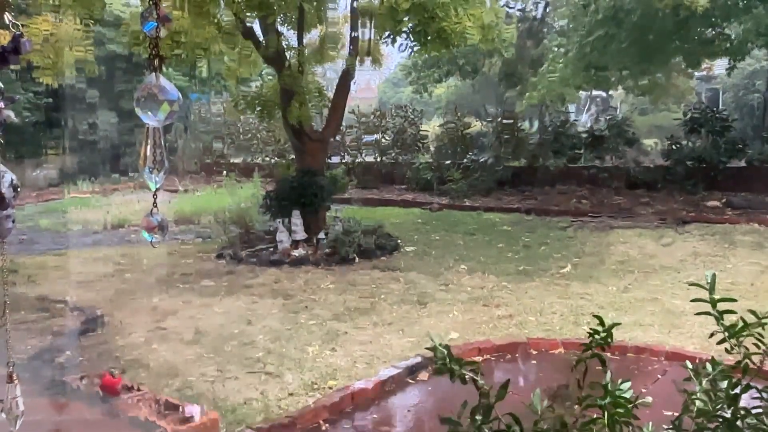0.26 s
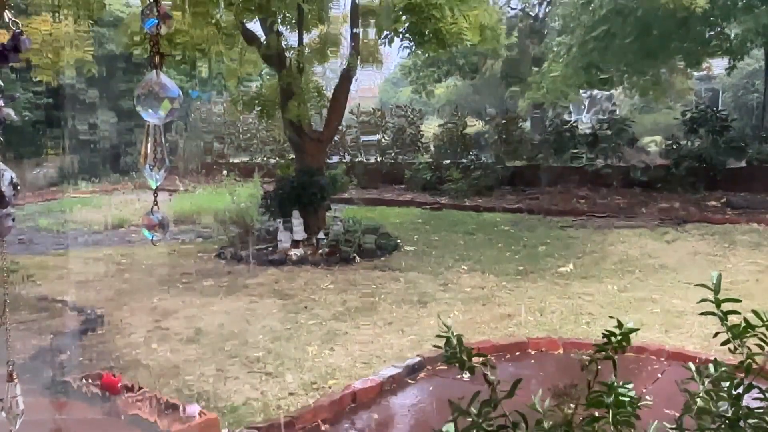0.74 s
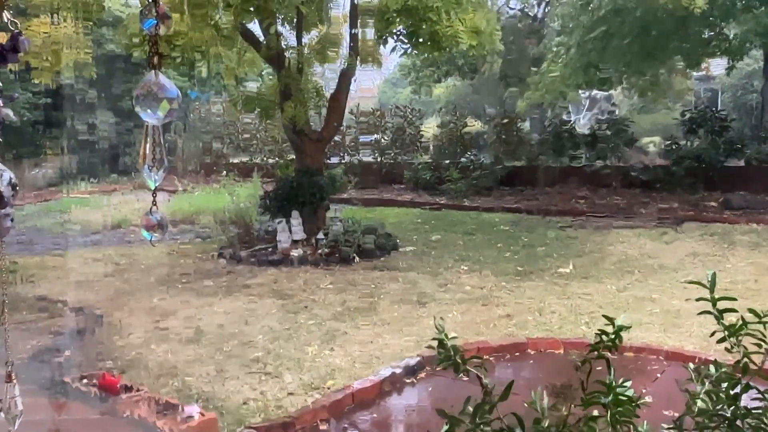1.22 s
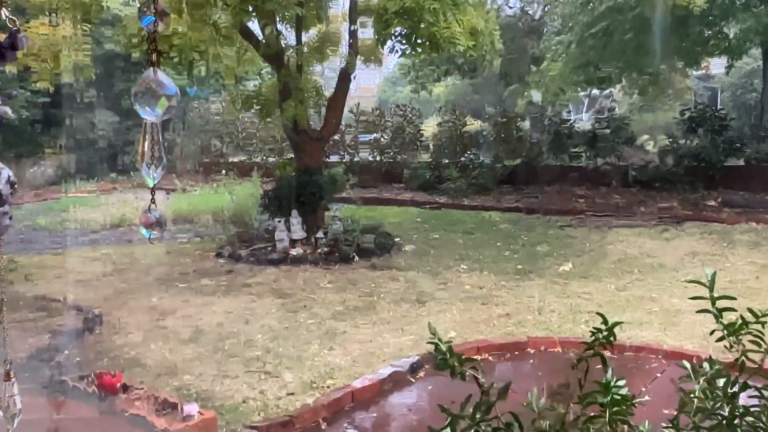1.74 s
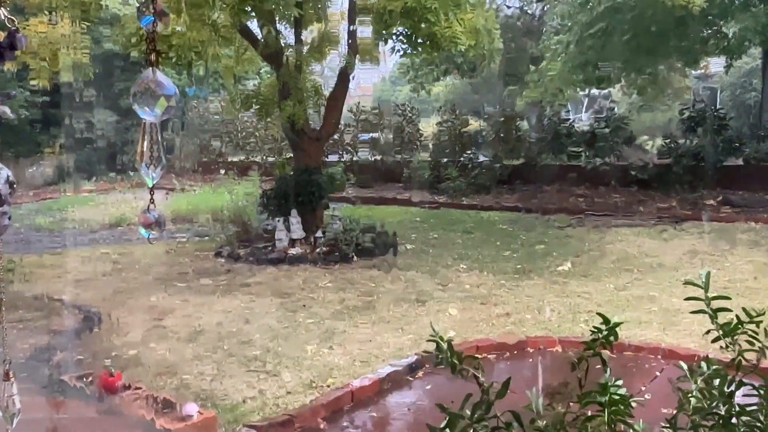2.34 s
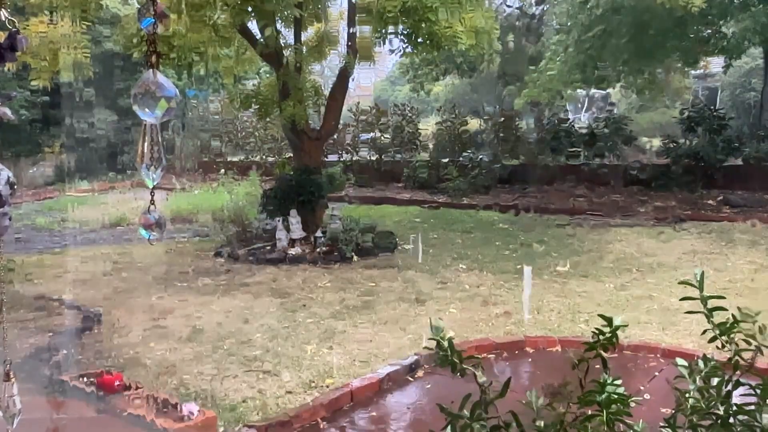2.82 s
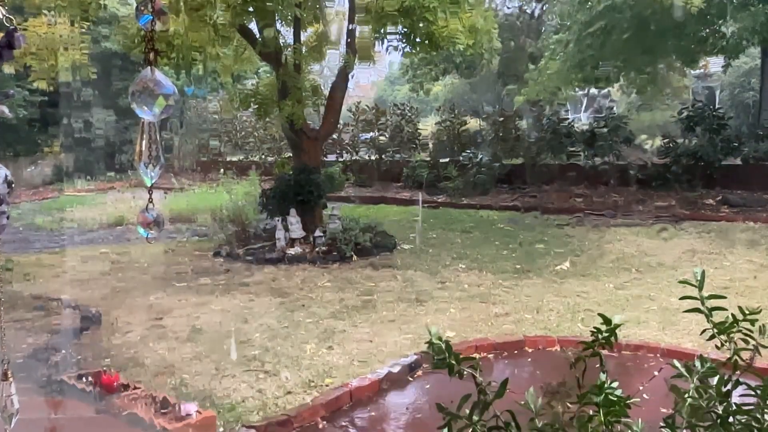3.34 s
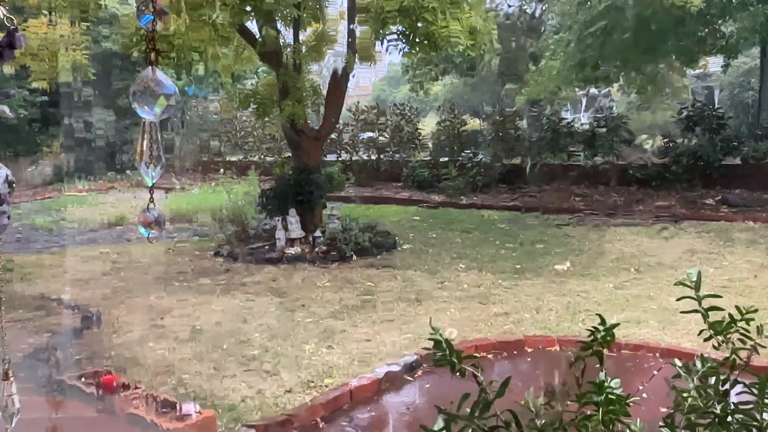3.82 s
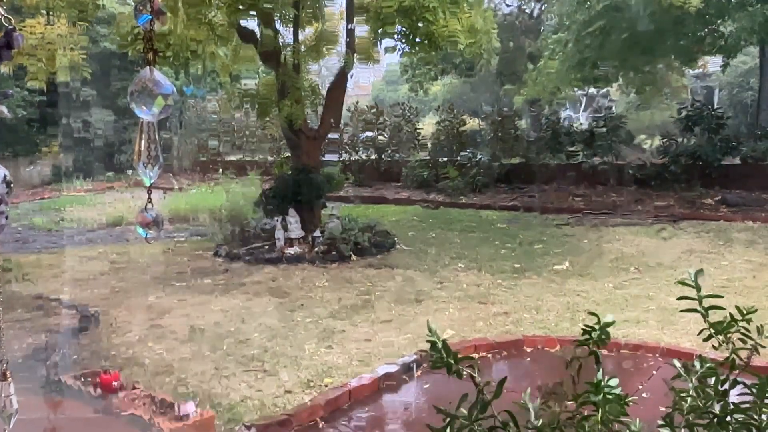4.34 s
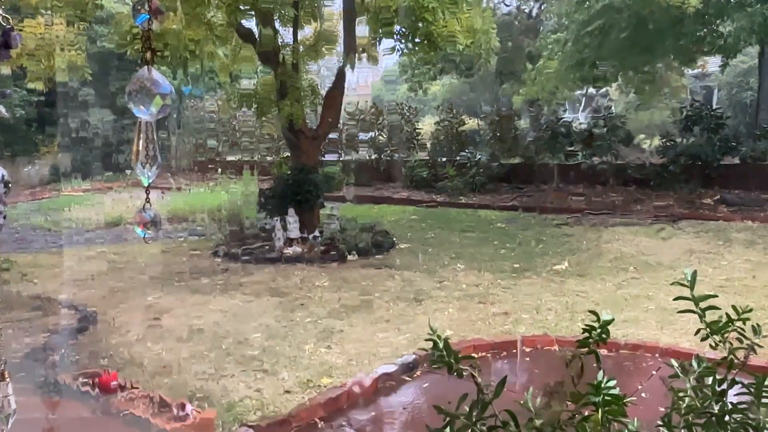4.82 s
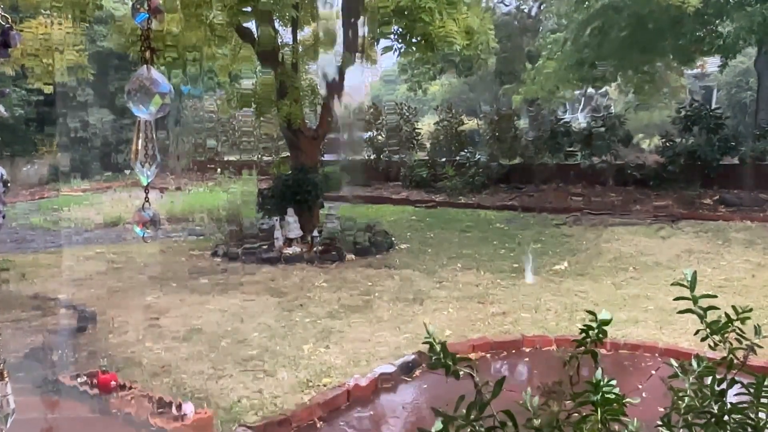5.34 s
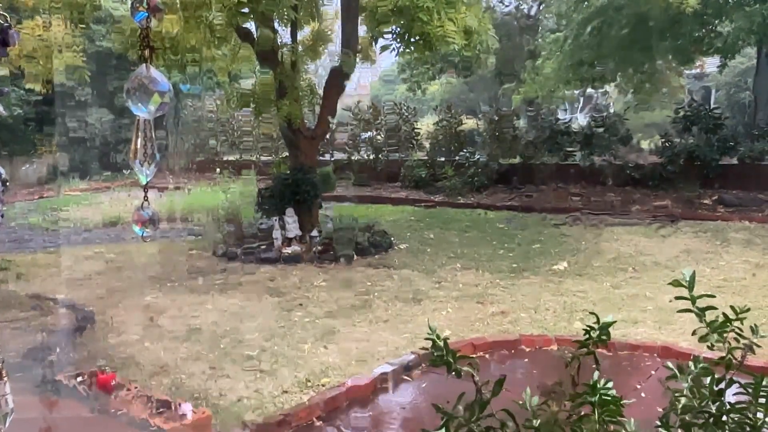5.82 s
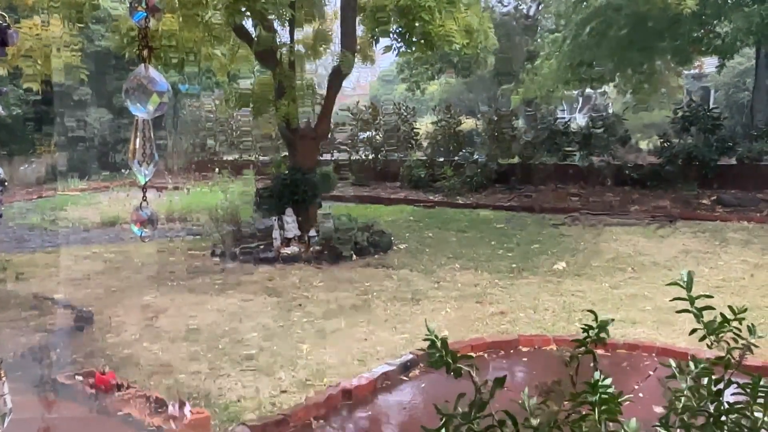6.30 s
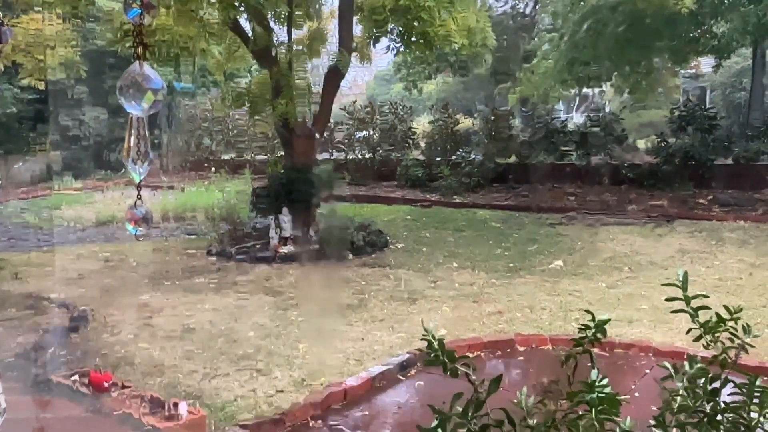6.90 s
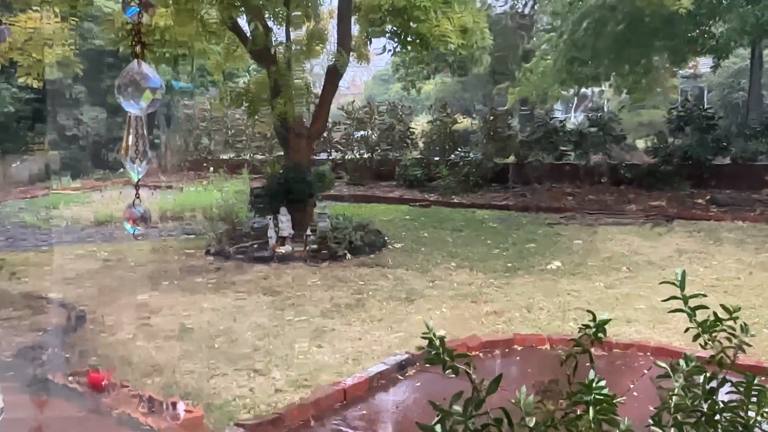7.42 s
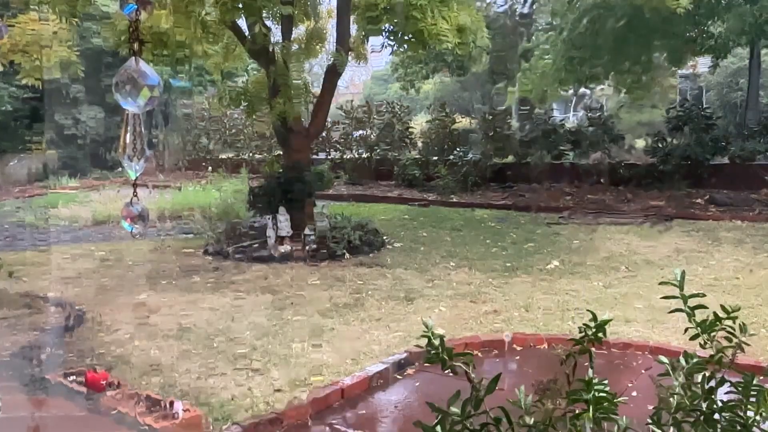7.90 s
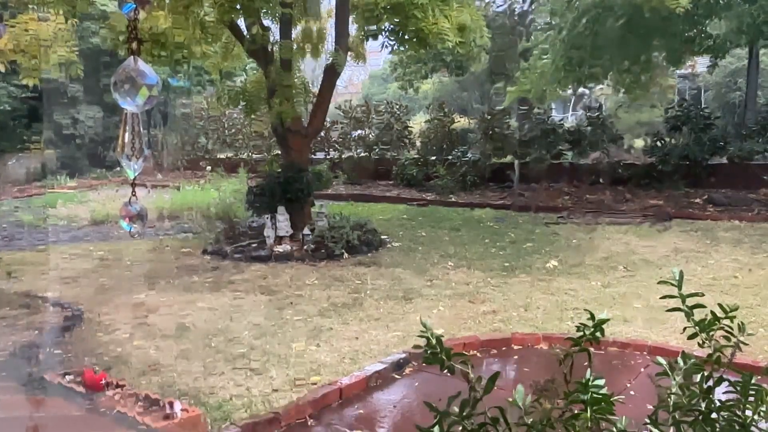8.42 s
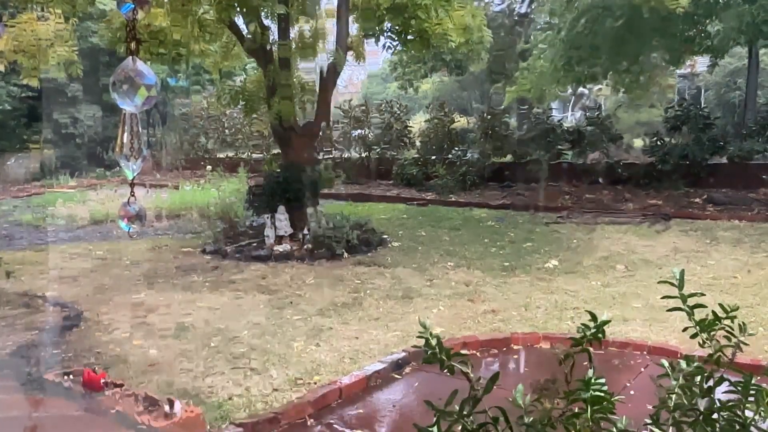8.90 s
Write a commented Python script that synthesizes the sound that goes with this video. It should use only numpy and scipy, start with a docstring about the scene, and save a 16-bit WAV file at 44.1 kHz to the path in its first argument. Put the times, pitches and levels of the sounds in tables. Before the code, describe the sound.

From a sheltered house, rain washes and drips tick on brick while a double thunder peal booms, rattles glass and slowly fades into low rumbling.

```python
"""Steady rain falls on a garden, heard from the shelter of a house: many random drops merge into a wash.
Thunder, a pile of tiny shocks, starts with a tearing sound, then peals twice, rattling a pane and booming.
It then rolls away in ever duller rumbles, shaped by a list of peals over a slowly changing roll.
All along, drips pat, tick and splash on wet brick and leaves, made of short bursts of tiny impacts.
Thin metal rings faintly under the drops, and pings under three heavier ones in the second half."""
import sys
import numpy as np
from scipy import signal
from scipy.fft import rfft, irfft
from scipy.io import wavfile
from scipy.ndimage import uniform_filter1d

SR = 44100
rng = np.random.default_rng(int(sys.argv[2]) if len(sys.argv) > 2 else 0)


def digitize_waveform(pressure):
    """Quantize a signal to 16-bit integers and store it at the path in sys.argv[1].

    Rows of a 2-D input are taken as channels; values are limited to [-1, 1].
    """
    field = np.atleast_2d(pressure).T
    bounded = np.clip(field, -1, 1)
    quanta = np.round(bounded * 32767).astype(np.int16)
    wavfile.write(sys.argv[1], SR, quanta)


N = 403956
TIME = np.arange(N) / SR
BINS_HZ = np.maximum(np.arange(N // 2 + 1) * SR / N, 1)

# In the tables, levels are relative: each sound's own gain may shift them all together.
# t60 is the time a sound takes to fall by 60 dB.


def from_db(db):
    """Turn decibels into a gain."""
    return 10 ** (np.asarray(db) / 20)


def rms_one(x):
    """Scale a signal to an average strength (rms) of 1."""
    return x / np.sqrt(np.mean(x ** 2) + 1e-20)


def at_hz(rows, hz):
    """Read the columns of a table at any frequency, on a log-frequency axis."""
    points, *columns = np.transpose(rows)
    return [np.interp(np.log(hz), np.log(points), column) for column in columns]


def tint(x, colour):
    """Give a signal a spectrum; white noise keeps its power."""
    gain = rms_one(from_db(at_hz(colour, BINS_HZ)[0]))
    return irfft(rfft(x) * gain, N)


def drift(rate):
    """Smooth chance: random points, `rate` of them a second, joined by straight lines."""
    points = rng.standard_normal(2000)
    return np.interp(TIME * rate, np.arange(len(points)), points)


def impacts(per_s, spread_db):
    """Two streams of randomly timed clicks of uneven size, with an rms of 1."""
    sizes = from_db(spread_db * np.minimum(rng.exponential(1, (2, N)), 4))
    signs = rng.choice([-1, 1], (2, N))
    happens = rng.random((2, N)) < per_s / SR
    return rms_one(sizes * signs * happens)


def flurry_energy(per_s, spread_db, t60):
    """Energy left by random impacts that each die away over t60 seconds."""
    fall = from_db(-60 / (SR * t60))
    hits = impacts(per_s, spread_db)[0] ** 2 + 1e-18
    return signal.lfilter([1], [1, -fall ** 2], hits)


def resonate(x, hz, width_hz):
    """Ring at one pitch, like a small struck body; white noise keeps its power."""
    r = np.exp(-np.pi * width_hz / SR)
    poles = [1, -2 * r * np.cos(2 * np.pi * hz / SR), r * r]
    return signal.lfilter([1, 0, -1], poles, x) * np.sqrt((1 - r * r) / 2)


def burst(age, rise_s, t60, tail_db, tail_t60):
    """Loudness shape of one impact: a quick rise, a fall, and a faint tail off the walls."""
    age = np.maximum(age, 0)
    rise = 1 - np.exp(-age / rise_s)
    fall = from_db(-60 * age / t60)
    tail = from_db(tail_db - 60 * age / tail_t60)
    return rise * (fall + tail)


def bursts(events, rise_s, t60, tail_db, tail_t60):
    """Loudness shape of a table of impacts, whose powers add up."""
    power = np.zeros(N + SR)
    shape = burst(TIME[:SR], rise_s, t60, tail_db, tail_t60)
    for s, db in events:
        start = max(int(s * SR), 0)
        power[start:start + SR] += (from_db(db) * shape) ** 2
    return np.sqrt(power[:N])


def swelling_tones(rows):
    """Each row is a resonance that builds up and soon dies."""
    out, age = np.zeros(N + SR), TIME[:SR]
    for s, hz, db, swell_s in rows:
        start = int(s * SR)
        swells = age / swell_s
        shape = swells * np.exp(1 - np.minimum(swells, 50))  # reaches 1 after swell_s
        out[start:start + SR] += from_db(db) * shape * np.sin(2 * np.pi * hz * age)
    return out[:N]


# short echoes off floor, roof and walls: (delay t/s, level/dB)
ECHOES = [(.00404, -38.5), (.00626, -17), (.00716, -45.5), (0.0335, -17), (.046, -17.5)]
# standing waves of the shelter: (f/Hz, width/Hz, level/dB)
STANDING_WAVES = [(44.3, 14, 2.5), (139.3, 5.5, -12.5), (214.7, 13.3, 4.5), (302, 9.4, 1.2), (378, 49, 4.5),
                  (436, 27, 3), (578, 43, 5), (701, 38, 4.5), (787, 16, 3), (797, 9.8, 6), (880, 33, 6),
                  (1002, 87, 5), (1330, 11, 2.5), (1437, 21, 4)]


def shelter(x):
    """Near walls add short echoes and lift or weaken a few standing waves."""
    response = 1
    for delay, db in ECHOES:
        response = response + from_db(db) * np.exp(-2j * np.pi * BINS_HZ * delay)
    lift_db = 0
    for hz, width, db in STANDING_WAVES:
        lift_db = lift_db + db / (1 + (2 * (BINS_HZ - hz) / width) ** 2)
    return irfft(rfft(x) * rms_one(response) * from_db(lift_db), N)


# colour of the rain and the storm's low murmur: (f/Hz, level/dB per Hz)
RAIN_COLOUR = [(20, -22.5), (45, 24), (180, 8.5), (400, 0.5), (900, -9.5), (1900, -8.5), (2600, -24.5),
               (4200, -22.5), (5500, -28.5), (7000, -28.5), (8100, -19.5), (9600, -26.5), (10800, -42.5),
               (15500, -50.5)]


def rain(drops_per_s=9000, spread_db=2.5, level_db=-52.5, waver_db=1.4, clump_db=1.2):
    """Countless far drops on lawn and trees merge into a wash over the storm's low murmur."""
    wash = tint(impacts(drops_per_s, spread_db), RAIN_COLOUR)
    hiss = irfft(rfft(wash) * np.interp(BINS_HZ, [5000, 8000], [0, 1]), N)
    waver = from_db(level_db + waver_db * drift(23))
    # the fine hiss of the nearest drops comes in clumps
    clumped_hiss = hiss * from_db(clump_db * drift(12))
    return waver * (wash - hiss + clumped_hiss)


def patter(per_s=240, level_db=-74.5, spread_db=4.5, width_hz=1500, tilt_db=-8.5, t60=0.09):
    """Lesser drips at random: short broad splats, each surface with its own pitch."""
    out, pitches = 0, np.geomspace(1600, 5600, num=8)
    for hz in pitches:
        energy = flurry_energy(per_s / len(pitches), spread_db, t60)
        ring = resonate(resonate(impacts(6000, 2.5), hz, width_hz), hz, width_hz)
        weight = from_db(tilt_db * np.log2(hz / pitches[0]))  # tilt_db per octave
        out = out + weight * rms_one(np.sqrt(energy) * ring)
    return from_db(level_db) * rms_one(out)


def lesser(count, db, spread_db):
    """Faint drops at random moments, one to each equal share of the time: rows (t/s, level/dB)."""
    place, size = rng.random((count, 2)).T
    times = (np.arange(count) + place) * N / SR / count
    return list(zip(times, db + spread_db * (2 * size - 1)))


# small hard drops that tick close by: (t/s, peak level/dB)
TICKS = [(0.1665, -61), (0.7896, -62), (1.499, -63), (3.1143, -63), (3.2625, -57.5), (3.7738, -62),
         (3.9862, -60), (4.245, -62), (4.5425, -65), (4.7155, -68), (5.7069, -59.5), (5.765, -64),
         (6.932, -74), (7.1881, -59.5), (7.265, -67), (7.4974, -71), (7.5637, -75), (8.638, -68)]
# drips that burst into spray on wet ground: (t/s, peak level/dB)
SPLASHES = [(0.7516, -63), (0.945, -63), (1.59, -69), (1.9699, -63), (2.2492, -63.5), (3.185, -62),
            (3.66, -64.5), (3.7843, -61), (4.14, -67), (4.1964, -65), (4.4934, -62), (4.7275, -56),
            (4.9, -67), (5.125, -67), (5.25, -68), (5.445, -63), (5.865, -75), (6.0661, -60), (6.48, -66),
            (6.6149, -60), (7.4981, -62), (7.5718, -59.5), (7.6894, -64), (7.915, -65), (8.235, -67),
            (8.6119, -59), (8.7046, -63), (8.8398, -62), (9.065, -72)]
# colour of a tick: (f/Hz, level/dB per Hz)
TICK_COLOUR = [(1500, -19.5), (3500, -8.5), (7000, 5), (9500, -2), (11000, -20.5), (15000, -10)]
# colour of the spray: (f/Hz, level/dB per Hz)
SPRAY_COLOUR = [(3000, -9.5), (6800, -5.5), (8000, 8), (9500, 0), (11000, -14.5), (15500, -31)]


def splashes(tick_db=1.0, spray_db=-5.5):
    """Near drops: a hard tick, or a hiss of fine droplets falling back."""
    ticks = TICKS + lesser(count=22, db=-65.5, spread_db=0.5)
    sprays = SPLASHES + lesser(count=22, db=-75.0, spread_db=-5.5)
    tick_shape = bursts(ticks, rise_s=0.00032, t60=0.014, tail_db=-11.0, tail_t60=0.17)
    spray_shape = bursts(sprays, rise_s=0.0027, t60=0.04, tail_db=-2.0, tail_t60=0.3)
    tick = tint(tick_shape * impacts(12000, 2.2), TICK_COLOUR)
    spray = tint(spray_shape * impacts(5000, 2.8), SPRAY_COLOUR)
    return from_db(tick_db) * tick + from_db(spray_db) * spray


# heavy drips on brick and leaves; narrow for a plop, wide for a splat:
# (t/s, level/dB, f/Hz, width/Hz, t60/s)
PATS = [(0.2882, -57, 6400, 1200, .03), (0.753, -60, 3700, 3000, .15), (0.929, -60.5, 4300, 2200, 0.37),
        (1.936, -55, 2970, 1180, 0.05), (1.989, -56, 2900, 1200, 0.058), (2.04, -56, 2970, 1200, 0.045),
        (2.228, -63, 4040, 2000, 0.38), (2.327, -59.5, 3300, 1494, 0.22), (2.4244, -55, 6000, 2400, .03),
        (2.44, -54, 5800, 2400, .035), (2.456, -58, 5800, 2000, .03), (2.482, -65, 5700, 1200, .04),
        (2.508, -59, 4200, 3500, 0.08), (3.228, -59.5, 3360, 1800, 0.17), (3.262, -55.5, 3200, 1610, 0.13),
        (3.647, -59.5, 3000, 2000, 0.14), (3.735, -53, 2300, 1090, 0.16), (3.85, -55, 2600, 1800, 0.11),
        (3.915, -55, 2400, 1000, 0.11), (3.962, -58, 3700, 2200, 0.097), (3.986, -47, 4630, 1390, 0.016),
        (4.244, -61, 2600, 2400, .1), (4.535, -52.5, 3300, 900, .035), (4.543, -61, 3600, 2200, 0.09),
        (5.513, -59.5, 2600, 1800, 0.32), (5.706, -58.5, 3230, 2600, 0.22), (5.876, -60, 2900, 2000, .12),
        (6.018, -60.5, 3180, 1700, 0.26), (6.29, -61.5, 3400, 1800, 0.12), (6.727, -55, 6100, 1600, 0.023),
        (6.7453, -47, 6700, 1700, 0.016), (6.756, -60, 6100, 1600, .04), (6.779, -59, 6400, 2200, .03),
        (6.782, -57.5, 3700, 1400, .06), (6.836, -46, 2000, 900, 0.12), (6.835, -56.5, 3770, 1800, 0.15),
        (6.932, -54.5, 4200, 800, 0.053), (6.973, -49, 1870, 1100, 0.05), (7.127, -57, 3170, 1400, 0.08),
        (7.188, -40, 3000, 480, 0.032), (7.199, -48, 3200, 905, 0.034), (7.563, -55.5, 3650, 2400, 0.1),
        (7.9, -65, 2900, 2000, 0.14), (8.077, -66, 3300, 1800, 0.11), (8.15, -49.5, 1970, 280, 0.087),
        (8.153, -58, 3770, 550, .05), (8.429, -58, 4600, 750, .06), (8.695, -62, 3200, 1500, 0.11),
        (9.011, -60, 3450, 1400, 0.14)]


def pats(gain_db=-5.0):
    """Each heavy drip hits sharply and breaks up in a flurry of tiny impacts; what it lands on rings briefly."""
    out = np.zeros((2, N + SR))
    grains = np.tile(impacts(14000, 4.0), 2)  # repeated, so late drips do not run out
    for s, db, hz, width_hz, t60 in PATS:
        shape = burst(TIME[:SR // 2], rise_s=0.0019, t60=t60, tail_db=-21.5, tail_t60=0.31)
        span = slice(int(s * SR), int(s * SR) + len(shape))
        body = resonate(resonate(grains[:, span], hz, width_hz), hz, width_hz)
        out[:, span] += from_db(db + gain_db) * shape * rms_one(body)
    return out[:, :N]


# pitches at which thin metal nearby, perhaps the gutter, rings: (f/Hz, rms level/dB, t60/s)
GUTTER_MODES = [(1320, -83.5, 0.12), (1340, -78.5, .15), (1600, -77.5, .2), (2090, -90, .2),
                (2210, -79.5, .2), (2364, -84, 0.36), (2490, -85.5, .38), (2850, -85.5, .2),
                (2940, -82, .2), (3140, -82, .12), (3500, -86.5, 0.14), (3540, -87, .1),
                (4220, -88.5, 0.23)]
# heavier drops on it: (t/s, level/dB above its steady ringing)
GUTTER_HITS = [(5.52, 21.5), (7.902, 19), (8.7, 17)]


def gutter(per_s=40, spread_db=3.0, gain_db=-5.5):
    """Drops keep the metal's modes faintly ringing; a heavy one makes them ping."""
    out = 0
    for hz, db, t60 in GUTTER_MODES:
        r = from_db(-60 / (t60 * SR))
        w = 2 * np.pi * hz / SR
        drops = impacts(per_s, spread_db) * np.sqrt(2 * (1 - r * r))  # makes the steady ringing rms 1
        for s, hit_db in GUTTER_HITS:
            drops[:, int(s * SR)] += from_db(hit_db) * rng.choice([-1, 1], 2)
        ring = signal.lfilter([0, np.sin(w)], [1, -2 * r * np.cos(w), r * r], drops + 1e-18)
        out = out + from_db(db + gain_db) * ring
    return out


# something loose clanks as the second peal hits: (t/s, f/Hz, peak level/dB, swell/s)
CLANKS = [(2.745, 1090, -42, 0.0062), (2.75, 958, -44, 0.0091), (2.805, 946, -50, 0.014)]


def clanks():
    """Something loose, struck by the second peal, rings briefly at a few pitches."""
    return swelling_tones(CLANKS)


# the pane knocks in its frame: (t/s, peak level/dB)
PANE_KNOCKS = [(1.693, -30.5), (1.763, -38), (1.8056, -36.5), (1.8695, -46), (2.7626, -49.5),
               (2.7776, -45.5), (2.7905, -55), (2.8195, -49.5), (2.837, -48), (2.858, -58.5), (2.873, -63),
               (2.9206, -52), (2.9479, -38), (2.9684, -54), (2.988, -52)]
# colour of the pane's knocks: (f/Hz, level/dB per Hz)
PANE_COLOUR = [(600, -0.5), (2000, 10), (3800, 2.5), (4700, -2.5), (5500, -3), (7000, -4.5), (9500, -10),
               (11000, -36)]


def rattle(gain_db=-0.5):
    """The peals shake a loose pane: short dry knocks of shaped noise."""
    shape = bursts(PANE_KNOCKS, rise_s=0.00097, t60=0.027, tail_db=-18.0, tail_t60=0.26)
    return from_db(gain_db) * tint(shape * rng.standard_normal((2, N)), PANE_COLOUR)


# the heaviest shocks boom between walls and roof: (t/s, f/Hz, peak level/dB, swell/s)
BOOMS = [(1.666, 142, -2.5, 0.01), (1.672, 42, -18, 0.046), (1.668, 282, -18, .012),
         (1.684, 204, -15.5, 0.0094), (1.69, 75, -12, 0.019), (1.705, 133.3, -7, 0.025),
         (1.68, 558, -28, 0.014), (1.81, 295, -19, 0.012), (1.878, 166.4, -22.5, 0.011),
         (2.763, 164, -8.5, 0.014), (2.76, 43.5, -16, 0.033), (2.833, 205, -11.5, 0.014),
         (2.908, 217.5, -8, 0.015), (2.945, 131.5, -12, 0.018), (3.715, 204, -21, 0.0066),
         (3.76, 112, -13, 0.0093), (3.829, 107, -16, 0.0028), (4.045, 189, -22.5, 0.014),
         (4.977, 190, -19.5, 0.0097), (5.04, 175, -21.5, 0.0069), (5.77, 205, -23, .006),
         (5.81, 109, -25, 0.0096), (6.858, 322, -30, 0.027), (6.892, 117, -20, 0.0088),
         (6.948, 130, -17, 0.0083), (7.024, 101, -18.5, 0.0046), (7.245, 200, -31, 0.013),
         (7.495, 202, -30, 0.011), (7.695, 117, -20, 0.0078)]


def booms(gain_db=-6.5):
    """A heavy shock builds up a standing wave under the roof, which soon dies."""
    return from_db(gain_db) * swelling_tones(BOOMS)


# single shock fronts stand out of the roll as dull knocks: (t/s, peak level/dB)
SHOCK_FRONTS = [(.403, -43), (.515, -48), (.672, -44), (1.135, -42), (1.35, -44), (1.652, -32),
                (1.972, -32.5), (2.73, -33), (2.755, -41), (4.036, -36), (4.943, -43.5), (4.987, -41),
                (5.775, -39), (5.835, -40.5), (6.872, -43.5)]
# colour of these knocks: (f/Hz, level/dB per Hz)
FRONT_COLOUR = [(120, -19), (300, 8), (450, -4.5), (650, -4), (1000, -9), (2000, -19.5), (3500, -40),
                (9000, -74.5)]


def knocks(gain_db=-6.5):
    """A steep front from a nearer bend of the lightning channel, with its echo off the houses."""
    shape = bursts(SHOCK_FRONTS, rise_s=0.00078, t60=0.27, tail_db=-22.0, tail_t60=0.41)
    return from_db(gain_db) * tint(shape * impacts(2500, 0.77), FRONT_COLOUR)


# each stretch of the lightning channel arrives as a peal or a softer surge; near ones keep their treble:
# (t/s, swell/s, length/s, level/dB, tilt of the lows/dB per octave, treble/dB, deep bass/dB)
PEALS = [(0.005, 0.048, 0.1, -44, -1, 15.5, -1.5), (0.395, 0.069, 0.1, -46, .5, 15.5, 6.5),
         (0.657, 0.018, 0.1, -44.5, 0.5, 13, -3.5), (1.104, 0.047, 0.27, -41, 8, -23, 16),
         (1.265, 0.061, 0.16, -44, 5.5, -1.5, 5.5), (1.546, 0.027, 0.025, -29.5, 6, -11, 14),
         (1.635, 0.024, 0.081, -21, 1.7, -0.5, -5), (1.704, .03, 0.099, -21, -2.5, 0.5, -4.5),
         (1.958, 0.011, 0.037, -32, 2, 0.5, -5.5), (2.084, 0.1, 0.09, -32, 0.5, -2.5, -12),
         (2.176, 0.022, 0.23, -36.5, 1, 1, -11), (2.357, 0.1, 0.16, -36.5, 1, 7.5, 6.5),
         (2.574, 0.069, 0.1, -35, -0.5, 5, -1.5), (2.715, 0.023, 0.16, -24.5, -2, 4.5, -7),
         (2.841, 0.028, 0.13, -27, 0.5, 3, -11), (3.042, 0.03, .07, -35.5, 0, -6, -2.5),
         (3.284, 0.051, 0.064, -40.5, 5, -6, 1), (3.435, 0.024, 0.18, -40.5, 4, -6, -14.5),
         (3.562, 0.061, 0.075, -30, 0.5, -7, -10.5), (3.685, 0.045, 0.17, -27, -2.5, -2, -11.5),
         (4.032, .02, 0.045, -30.5, -2, -9, -16), (4.132, 0.053, 0.082, -46, 2, -7, -0.5),
         (4.284, 0.084, 0.11, -45, 6.5, -5.5, 0.5), (4.433, 0.046, 0.083, -43, 6, -6.5, -0.5),
         (4.632, 0.05, 0.055, -44, 3, 4, 5), (4.947, 0.041, 0.13, -32.5, 3, -12, 4),
         (5.125, 0.052, .08, -45.5, 3.5, -13, 3), (5.528, 0.099, 0.044, -50.5, -6.5, -1, 7),
         (5.671, 0.085, 0.18, -36, 1, -5, 6), (5.894, 0.027, 0.065, -37, 2.5, -17, -4.5),
         (6.018, 0.054, 0.12, -44.5, 0, 2, 0.5), (6.294, 0.041, 0.067, -44, 0.5, 2, 7),
         (6.541, 0.086, 0.061, -45, 6, -19, 4), (6.826, 0.05, 0.24, -30.5, 2.5, -19, -5.5),
         (7.091, 0.043, 0.085, -36.5, 0.5, -5, 2.5), (7.202, .04, 0.092, -34.5, -0.5, -8, -7.5),
         (7.465, 0.025, 0.11, -31.5, -1, -14, -3), (7.644, 0.025, 0.071, -34.5, -1, -12, 2),
         (7.764, .05, 0.13, -35, 3, -36, -3), (7.875, 0.082, 0.15, -39, 2, -19, -6.5),
         (8.255, 0.066, 0.064, -48.5, -5.5, -18, 9), (8.388, 0.015, 0.15, -44.5, 0.5, -11, 10.5),
         (8.645, 0.048, 0.11, -44.5, -2, -2, -1)]
# the roll that cloud and land throw back between the peals:
# (t/s, level/dB, tilt of the lows/dB per octave, treble/dB)
ROLL = [(0.0, -48.5, -2.5, 17.5), (0.31, -56.5, -5, 28), (0.57, -53, 3, 18.5), (1.06, -57, 7.5, 8.5),
        (1.15, -43.5, -1, 14.5), (1.55, -37.5, 3.5, 1.5), (1.85, -29.5, -3, 8.5), (2.29, -41.5, 1.5, 5),
        (2.67, -51, 1, 11.5), (3.0, -38, -3.5, 9.5), (3.3, -44.5, 0.5, 6.5), (4.18, -42, -1.5, 3.5),
        (4.83, -48.5, 6.5, 0.5), (5.31, -44, 3.5, -1), (5.72, -48, 1.5, 6), (6.25, -47, -0.5, 3.5),
        (6.74, -41, -1.5, 3.5), (8.2, -44, -1, -2.5), (9.16, -46, -3, -22)]
TILT_PIVOT_HZ, TILT_OCTAVES = 183, 1.44  # the tilt acts this far on either side of the pivot
TREBLE_HZ = (428, 1880)  # the treble's gain sets in over this range
DEEP_HZ = (50, 130)  # the deep bass's gain fades out over this range
PEAL_FALL_DB_PER_S = 113


def thunder_gain(hz):
    """Strength of the thunder at one pitch: every peal rises, holds and dies away on top of the roll."""
    octaves = np.clip(np.log2(hz / TILT_PIVOT_HZ), -TILT_OCTAVES, TILT_OCTAVES)
    high = np.interp(np.log(hz), np.log(TREBLE_HZ), [0, 1])
    deep = np.interp(np.log(hz), np.log(DEEP_HZ), [1, 0])
    time = TIME[::40]  # a coarse clock is enough for slow changes
    s, db, tilt_db, treble_db = np.transpose(ROLL)
    roll_db = np.interp(time, s, db + octaves * tilt_db + high * treble_db)
    power = from_db(roll_db) ** 2
    for s, swell_s, length, db, tilt_db, treble_db, deep_db in PEALS:
        rise = np.clip((time - s) / swell_s, 0, 1)
        fall_db = PEAL_FALL_DB_PER_S * np.maximum(time - s - length, 0)
        colour_db = octaves * tilt_db + high * treble_db + deep * deep_db
        power += (rise * from_db(db + colour_db - fall_db)) ** 2
    return np.interp(TIME, time, np.sqrt(power))


# colour of the crackle: (f/Hz, level/dB per Hz)
CRACKLE_COLOUR = [(500, -12), (1200, 6.5), (2200, 5.5), (2800, -5.5), (3700, -10.5), (4700, -21.5),
                  (9000, -42), (11000, -62)]


def crackle(per_s=330, spread_db=2.7, t60=0.018, gain_db=-21.5, steepening=1.46):
    """The sharpest shocks make the treble crackle densely; it grows faster than the peal that carries it."""
    energy = flurry_energy(per_s, spread_db, t60)
    snaps = rms_one(np.sqrt(energy) * rng.standard_normal((2, N)))
    strength = thunder_gain(TREBLE_HZ[1]) ** steepening
    return from_db(gain_db) * tint(snaps, CRACKLE_COLOUR) * strength


# long-term colour of the thunder: (f/Hz, level/dB per Hz)
THUNDER_COLOUR = [(22, -30.5), (31, -22), (42, 0), (75, 3), (135, 0.5), (230, -2.5), (330, -12.5),
                  (480, -19.5), (700, -26.5), (1800, -31.5), (2200, -40), (2650, -49.5), (4500, -68),
                  (9000, -65.5), (11000, -100)]


def thunder(shocks_per_s=1100, spread_db=-0.5, level_db=-0.33, even_s=.06, flutter_db=0.85, lumps_db=2.16):
    """Shocks from all along the lightning channel pile up; those from far away have lost their treble."""
    shocks = rfft(shelter(tint(impacts(shocks_per_s, spread_db), THUNDER_COLOUR)))
    edges_hz = [26, 58, 100, 170, 280, 480, 650, 850, 1150, 2200, 12000]
    out = 0
    for low, high in zip(edges_hz, edges_hz[1:]):
        band = irfft(shocks * ((BINS_HZ >= low) & (BINS_HZ < high)), N)
        # so many shocks overlap that each stretch of the channel gives an even roar
        swell = np.sqrt(uniform_filter1d(band ** 2, int(even_s * SR), axis=1) + 1e-18)
        roar = band / swell * band.std()
        lumps = from_db(lumps_db * drift(16))
        out = out + roar * thunder_gain(np.sqrt(low * high)) * lumps
    return from_db(level_db + flutter_db * drift(45)) * out


# the two microphones: (f/Hz, left-right likeness from 0 to 1, lead of the left/rad, left minus right/dB)
PORTS = [(40, 1, .07, 3), (90, 0.95, .12, -1), (165, 0.93, .05, -0.1), (268, 0.91, .45, -1.5),
         (426, 0.59, 0.69, 1.7), (630, 0.18, 1.13, -1), (930, 0.4, 1.54, 0.5), (1507, 0.51, 3.74, 1),
         (1900, 0.34, 2.55, 1.3), (2520, 0.24, 2.65, 2.3), (3370, .17, 0.53, 1.2), (5300, 0.15, 2.1, 2.5),
         (7500, 0.57, 2.1, 6), (8500, 1, 2, 3.5), (10300, 0.58, .7, -1.5)]


def microphones(pair):
    """Two ports hear the bass alike and the middle and lower treble less alike;
    around 8500 Hz they agree again, and the left one leads."""
    alike, lead, balance_db = at_hz(PORTS, BINS_HZ)
    alike = np.clip(alike, 0, 1)
    sides = np.array([[1], [-1]])  # left, right
    common, apart = rfft(pair)
    ports = np.sqrt((1 + alike) / 2) * common + sides * np.sqrt((1 - alike) / 2) * apart
    phase = np.exp(1j * sides * lead / 2)
    return irfft(ports * phase * from_db(sides * balance_db / 2), N)


def scene():
    """Rain and drips, the house's answer to the thunder, and the thunder itself."""
    under_roof = shelter(rain() + patter() + splashes() + pats() + knocks())
    shaken = clanks() + booms()
    heard = microphones(under_roof + gutter() + rattle() + crackle() + thunder())
    return heard + shaken * from_db([[-.7], [.7]])  # slightly stronger on the right


def record(dry):
    """The microphone loses the lowest bass, and the top is cut steeply."""
    heard = irfft(rfft(dry) / np.sqrt(1 + (30 / BINS_HZ) ** 12), N)
    # at least 70 dB down from 16400 Hz upwards
    top_cut = signal.cheby2(14, 70, 16400, fs=SR, output="sos")
    return signal.sosfilt(top_cut, heard)


dry = scene()
out = record(dry)
digitize_waveform(out)
```